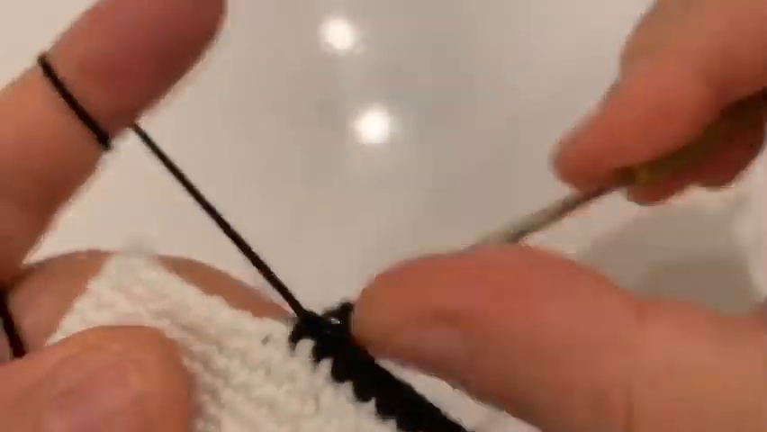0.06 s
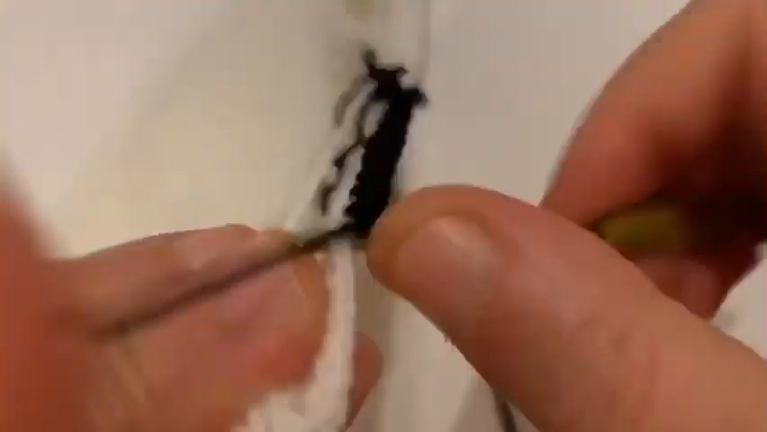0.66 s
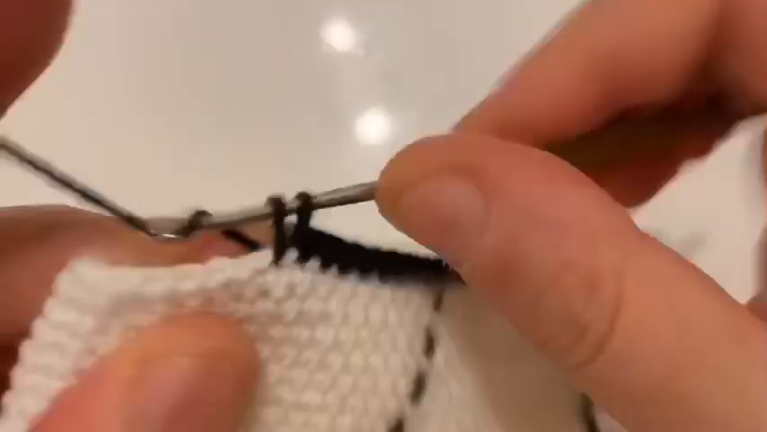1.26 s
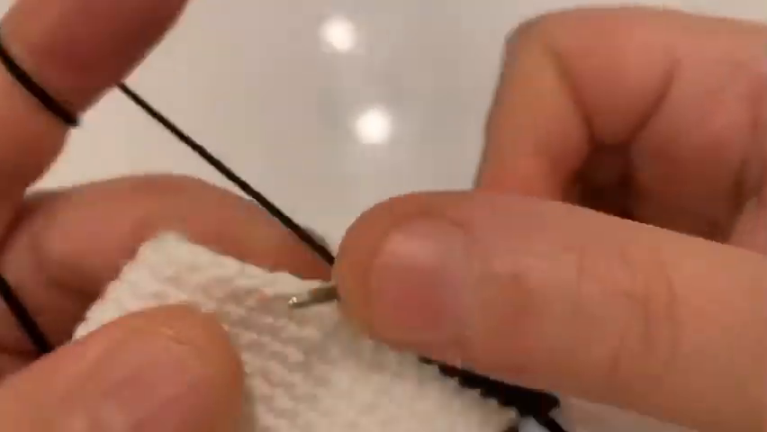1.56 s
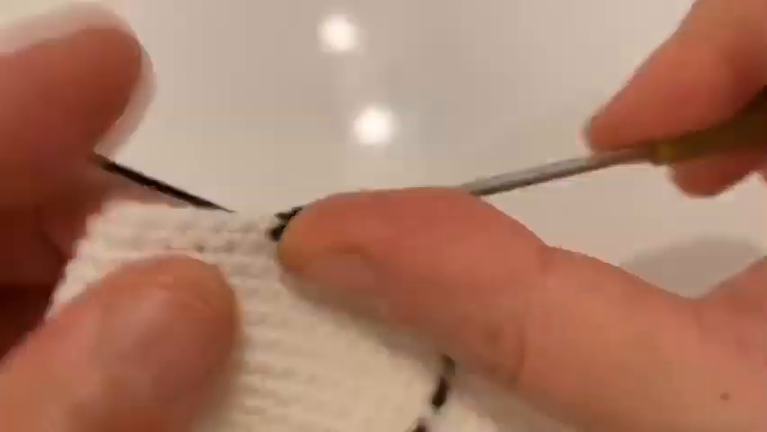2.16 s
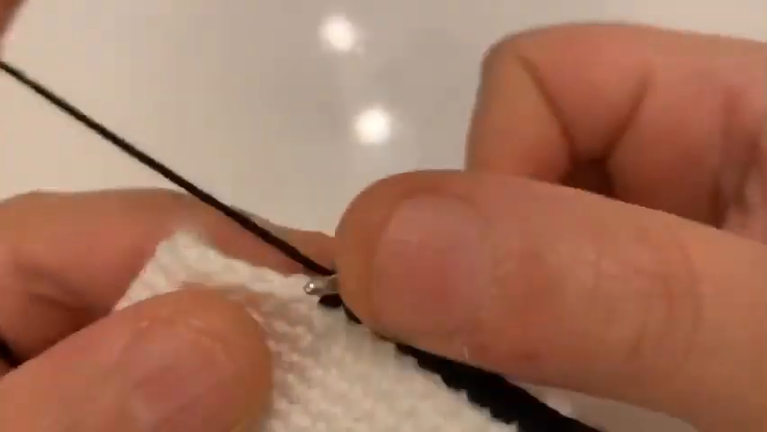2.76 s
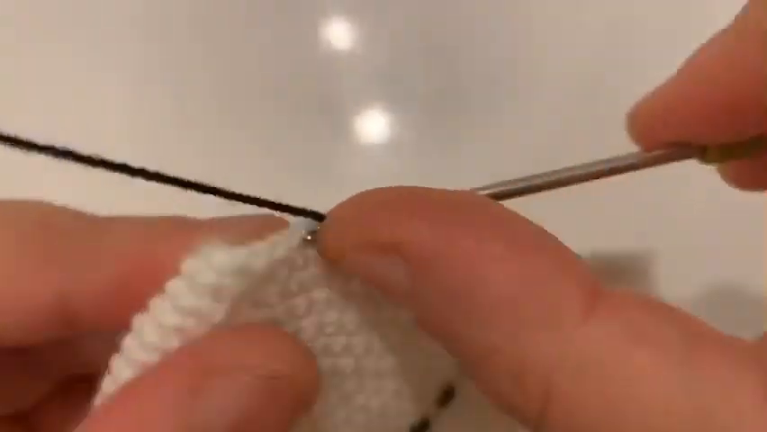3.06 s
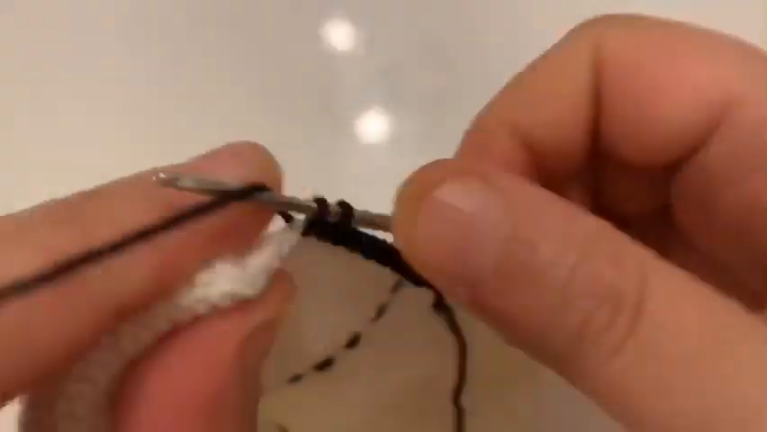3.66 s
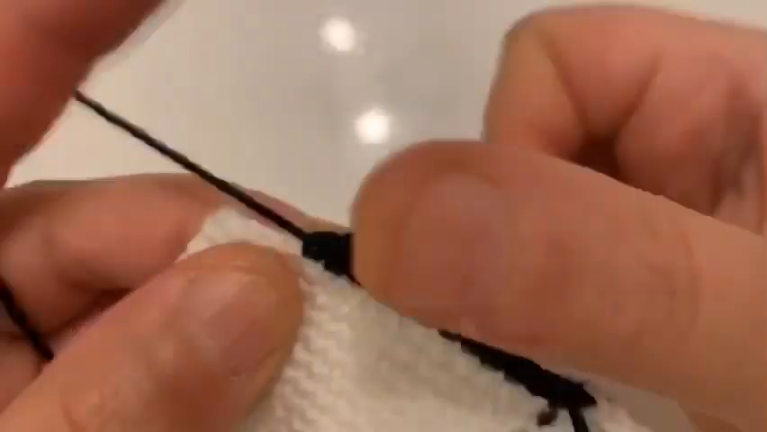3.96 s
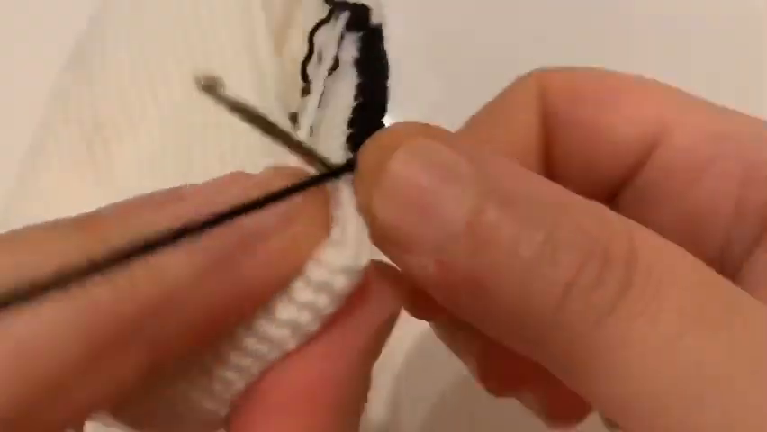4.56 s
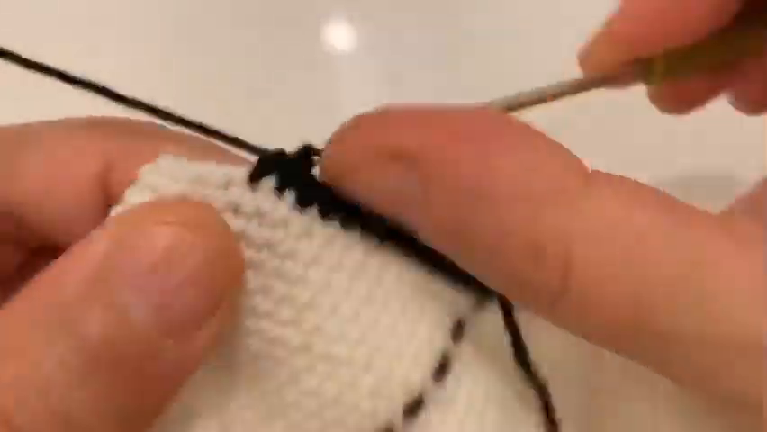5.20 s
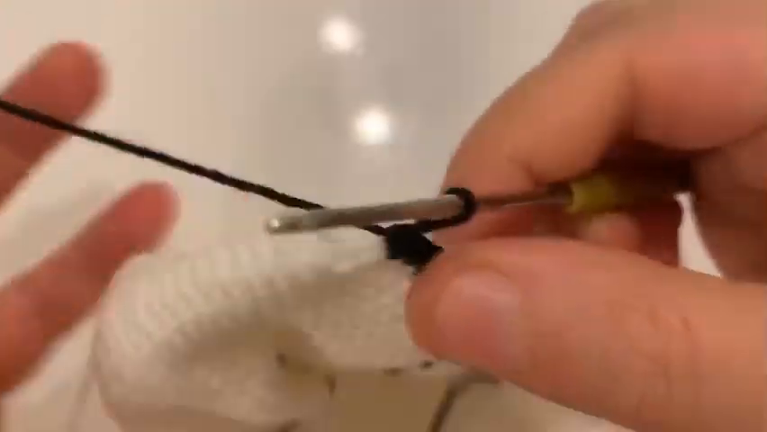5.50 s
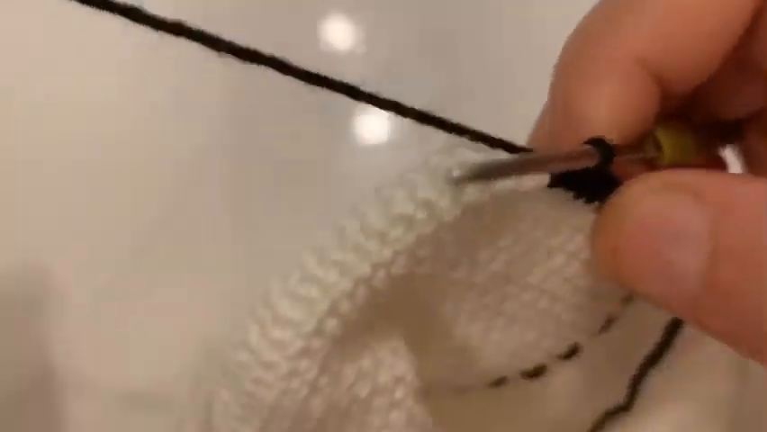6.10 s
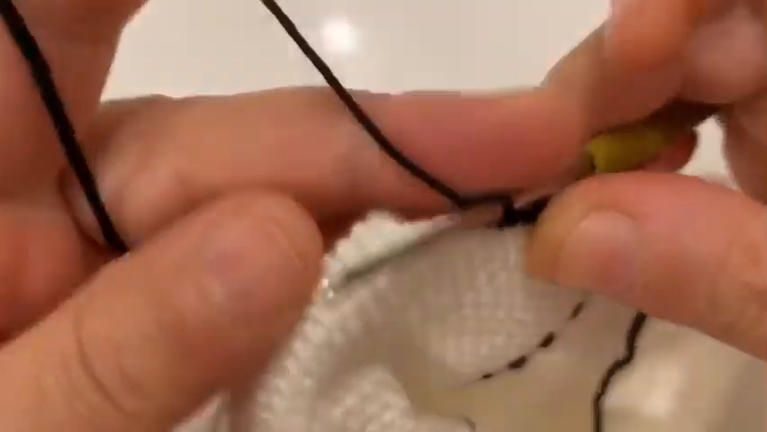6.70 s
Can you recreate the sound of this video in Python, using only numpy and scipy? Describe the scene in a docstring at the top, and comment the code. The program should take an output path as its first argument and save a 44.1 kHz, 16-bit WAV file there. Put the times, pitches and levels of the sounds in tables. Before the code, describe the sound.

A metal hook crochets yarn along the edge of a fabric piece, close to the microphone, at about one stitch a second. Fibres slide, catch and let go in grainy rustles, while the hook tip ticks through loops. The stretched fabric gives soft thuds, and a hand now and then bumps the table. Near the end, a tight strand faintly twangs and sizzles over the metal. The small room is quiet.

```python
"""A metal hook crochets yarn along the edge of a knitted piece, close up, about one stitch a second.
Fibres slip over hook and fingers in a grainy rustle, catch and let go. The hook tip ticks through
loops, and a strand drawn tight sometimes twangs or sizzles. The stretched fabric gives soft thuds,
and a hand now and then bumps the table. A quiet room lies behind."""
import sys
import numpy as np
from scipy import signal
from scipy.fft import rfft, irfft
from scipy.io import wavfile
from scipy.ndimage import uniform_filter1d

SR = 44100
rng = np.random.default_rng(int(sys.argv[2]) if len(sys.argv) > 2 else 0)


def unload_wav(signal):
    """Save mono or channel-first audio to the path in sys.argv[1] as 16-bit WAV at rate SR, clipped to [-1, 1]."""
    wavfile.write(
        sys.argv[1],
        SR,
        np.round(np.clip(np.atleast_2d(signal).T, -1, 1) * 32767).astype(np.int16),
    )


N = 301644
TIME = np.arange(N) / SR
FREQ = np.maximum(np.arange(N // 2 + 1) * SR / N, 1)

# the two microphone openings: f/Hz, likeness (0 to 1), left minus right/dB
MIC_PORTS = [(80, 0.82, 0), (390, 0.9, 1), (950, 0.64, 4.5), (1680, 0.28, 6), (2720, 0, 4.5), (3160, 0, 2),
             (5460, 0.35, -1), (7800, 1, -0.5), (14800, 1, 0)]
# how loud the room air and a faint airy wash are: t/s, level/dB
AIR_LEVELS = [(0, -64), (.6, -68.5), (3.1, -67), (5.5, -75.5), (6.84, -84)]
WASH_LEVELS = [(0, -75), (5.4, -84), (6.0, -63), (6.4, -60.5), (6.84, -61)]
# the tone colour of each noise, from bass to treble: f/Hz, level/dB
AIR_SPECTRUM = [(20, -4), (50, 1), (100, -6.5), (200, -11), (340, -12.5), (550, -23.5), (1100, -31.5),
                (2500, -41), (6000, -34.5), (9000, -33), (15500, -35)]
WASH_SPECTRUM = [(40, -1), (100, -3), (230, -1.5), (350, 0), (600, -23), (1200, -24), (2300, -16.5),
                 (5000, -85)]
TICK_SPECTRUM = [(100, -11), (450, 32.5), (1100, 24), (2500, 12), (5000, -27), (9000, 13), (15700, 18)]
SNAG_SPECTRUM = [(150, 33.5), (500, 20.5), (1100, 19.5), (2000, 12.5), (4000, 8.5), (6300, -1), (8700, 2),
                 (11000, -1.5), (15700, -14)]
SIZZLE_SPECTRUM = [(5000, -30), (9000, 4), (12000, 1.5), (14500, 10), (15700, 2.5)]
HISS_SPECTRUM = [(1500, -1.5), (3000, 1), (4400, 6.5), (5200, 3.5), (6400, 1.5), (7600, 0.5), (8100, 1),
                 (8700, 10.5), (9500, 0), (11000, 2), (13000, 5.5), (15700, 6)]
RASP_SPECTRUM = [(150, 6), (300, 3), (550, 4.5), (780, 3.5), (1080, 6.5), (1380, 0), (1720, 2), (2100, -3),
                 (2600, -2.5), (4000, -7.5), (8000, -30)]
RUMBLE_SPECTRUM = [(15, -63), (35, 5), (65, 1), (140, 0.5), (230, -11.5), (400, -38), (900, -27.5)]
# a hand bumps the table: t/s, level/dB, treble cutoff/Hz
TABLE_BUMPS = [(1.167, -32.5, 330), (2.416, -31, 520), (3.193, -28.5, 710), (3.664, -24.5, 1060),
               (4.451, -36.5, 610), (4.971, -24.5, 900), (5.559, -34.5, 283)]
# the notes the table rings at: f/Hz, relative level/dB, time to fade by 60 dB/s
TABLE_NOTES = [(53.8, 8, 0.63), (115.8, 7, 0.49), (137, 12.5, 0.51), (151.5, -31, .28), (211.4, 2.5, 0.51),
               (279.3, 1.5, 0.61), (349.3, 1.5, 0.48), (454, -4, 0.31), (677, -19, 0.092)]
# paths through the table top, direct and back from its edges: relative length, level/dB
TABLE_PATHS = [(0.999, 1), (1.75, -8), (2.499, -7), (3.601, -6)]
# the stretched fabric jerks: t/s, level/dB, f/Hz, overtone relative to the main swing/dB
FABRIC_JERKS = [(0.078, -27, 112, -5), (0.089, -34, 68, -14), (0.112, -35, 140, -10),
                (0.921, -37.5, 258, -13), (.965, -37.5, 129, -6.5), (1.012, -27.5, 76.6, -4),
                (1.337, -28.5, 80, -3), (1.396, -29, 102, -2.5), (1.453, -35.5, 92, -18),
                (1.478, -31, 60.6, -24), (2.212, -36, 133, -25), (2.251, -20, 82.3, -30),
                (2.581, -37, 69, -4), (2.654, -38, 78, -3.5), (2.700, -31.5, 109, -26),
                (3.539, -32.5, 63, -18), (3.947, -34, 80, -16), (4.05, -43, 83, -21),
                (4.790, -39.5, 76, -16), (5.282, -39.5, 69, -14), (5.356, -41, 62, -18),
                (5.473, -38.5, 78, -23), (5.934, -47, 114, -10), (6.765, -39, 112, -17)]
# a strand is drawn tight: t/s, level/dB, length/s, first f/Hz, last f/Hz
STRAND_PULLS = [(6.262, -51, 0.048, 70, 230), (6.542, -40.5, 0.0298, 123, 545)]
# the hook tip pops through a loop: t/s, level/dB
TIP_POPS = [(.076, -28.5), (1.009, -30), (1.394, -27), (1.475, -29), (2.505, -48), (2.663, -31.5),
            (5.244, -33), (5.921, -31.5), (6.537, -32), (6.598, -42)]
# the hook catches a strand and lets go: t/s, level/dB, fade/s, hiss of freed fibres/dB
CATCHES = [(.073, -42, 0.0064, -49), (.149, -43.5, 0.0053, -53), (0.227, -44.5, .007, -60),
           (0.726, -55, 0.01, -64), (0.921, -49, 0.039, -56), (1.009, -40.5, 0.0072, -46),
           (1.342, -36, 0.0064, -68), (1.393, -37, 0.014, -48), (1.476, -32.5, 0.0053, -45),
           (2.008, -61, 0.0035, -55.5), (2.202, -46, 0.0065, -62), (2.244, -37.5, 0.011, -44),
           (2.504, -39.5, .004, -58), (2.572, -40, 0.0049, -62), (2.613, -47, 0.0075, -51.5),
           (2.663, -43, .004, -60), (2.726, -42, 0.019, -55), (2.887, -49, 0.018, -55.5),
           (3.565, -46, 0.0079, -51), (3.909, -44, 0.015, -46.5), (4.184, -45.5, 0.0031, -64),
           (4.806, -45.5, 0.019, -60), (5.065, -41.5, 0.0041, -62), (5.246, -39, 0.013, -46.5),
           (5.469, -42, 0.011, -47), (5.922, -42, 0.0088, -54), (6.264, -44, 0.0072, -58),
           (6.599, -41.5, 0.0092, -59), (6.766, -46, 0.003, -62)]
# a tight strand runs over the bare metal: t/s, level/dB, build-up/s
METAL_SLIDES = [(6.224, -51.5, 0.0094), (6.301, -43, .003), (6.596, -45, 0.023)]
# the fingers lightly touch the piece, also between strokes: t/s, level/dB
TOUCH_LEVELS = [(0, -61.5), (.36, -64), (.55, -77.5), (1.1, -69.5), (1.6, -59), (1.76, -80.5), (2.15, -74),
                (2.6, -62.5), (3.08, -83.5), (3.24, -64), (3.85, -62.5), (4.4, -72.5), (4.68, -74.5),
                (5.2, -62), (5.78, -72), (6.0, -67), (6.12, -74), (6.84, -69.5)]
# one push or pull of the hook: t/s, length/s, hiss/dB, rasp/dB, f/Hz of the hollow between the fingers
HOOK_STROKES = [(0.087, 0.025, -52, -54, 1010), (0.167, 0.075, -51.5, -47.5, 1690),
                (0.298, 0.041, -48, -47, 1890), (0.743, 0.063, -60.5, -66.5, 1900),
                (0.917, 0.048, -54, -52.5, 2240), (0.987, 0.082, -54, -57, 2000),
                (1.309, 0.093, -57.5, -54, 2560), (1.389, 0.027, -48.5, -48.5, 1200),
                (1.447, 0.023, -46.5, -48, 1040), (1.506, .068, -51.5, -47, 1450),
                (1.991, 0.079, -60, -71, 1450), (2.169, .12, -53.5, -56, 1120),
                (2.285, 0.079, -75, -61.5, 1570), (2.6, .128, -54.5, -53.5, 2880),
                (2.771, 0.056, -53.5, -53.5, 5050), (2.873, 0.024, -60, -51.5, 4820),
                (3.355, 0.029, -55.5, -62.5, 2780), (3.474, 0.046, -51, -57.5, 3000),
                (3.546, 0.032, -52.5, -52, 1390), (3.756, 0.075, -59, -64, 2620),
                (3.893, 0.066, -51, -49, 1520), (3.98, 0.031, -58, -52.5, 2300),
                (4.046, 0.04, -47.5, -49, 2720), (4.117, .03, -59, -55, 1210),
                (4.267, 0.063, -88, -65.5, 1060), (4.528, 0.086, -60, -73, 4950),
                (4.703, 0.12, -58, -60, 2210), (5.028, 0.049, -59.5, -62, 2930),
                (5.209, 0.13, -53, -55, 1150), (5.361, 0.064, -52, -55, 1490),
                (5.43, 0.043, -51.5, -45, 945), (5.496, 0.064, -63, -65.5, 4000),
                (5.596, 0.08, -57, -54.5, 1440), (6.204, 0.03, -59.5, -59, 870),
                (6.239, 0.12, -66, -58.5, 1920), (6.75, 0.049, -63.5, -53.5, 1146)]

SNAG_BUILD_S, HISS_FADE_S, RASP_FADE_S = 0.0025, 0.016, 0.023


def undb(db):
    """Turn decibels into a number to multiply by."""
    return 10 ** (np.asarray(db) / 20)


def unit(x):
    """Scale a signal so that its average strength (rms) is 1."""
    return x / np.sqrt(np.mean(x ** 2))


def noise():
    """Two unrelated white noises."""
    return rng.standard_normal((2, N))


def wander(rate):
    """A random line, mostly between -1 and 1, that turns `rate` times a second."""
    return 1.01 * np.interp(TIME * rate, np.arange(N // 8), rng.standard_normal(N // 8))


def add(track, s, sound):
    """Mix a sound in at s seconds."""
    i = int(s * SR)
    track[..., i:i + sound.shape[-1]] += sound[..., :N - i]


def over_time(rows):
    """Join (t/s, level/dB) points into a volume curve."""
    s, db = np.transpose(rows)
    return undb(np.interp(TIME, s, db))


def over_pitch(rows):
    """Join a table's points into one curve per column, from bass to treble."""
    hz, *columns = np.transpose(rows)
    return [np.interp(np.log(FREQ), np.log(hz), c) for c in columns]


def bursts(rows):
    """A force that builds up to each given moment and fades after it."""
    force = np.zeros(N)
    for s, db, build, fade in rows:
        near = slice(*np.searchsorted(TIME, [s - 10 * build, s + 10 * fade]))
        t = TIME[near] - s
        force[near] += undb(db) * np.exp(-np.abs(t) / np.where(t < 0, build, fade))
    return force


def filtered(x, order, hz, kind="low"):
    """Keep what lies below hz, or inside a band."""
    return signal.sosfilt(signal.butter(order, hz, kind, fs=SR, output="sos"), x)


def stereo(pair, spectrum, treble_lag_s=.00026):
    """Colour two noises and mix them as the microphone hears them; treble reaches the right first."""
    shared, own = rfft(pair) * undb(over_pitch(spectrum)[0])
    likeness, side_db = over_pitch(MIC_PORTS)
    likeness = np.clip(likeness, 0, .995)
    lag = treble_lag_s * np.clip((FREQ - 1200) / 1200, 0, 1)
    right = (likeness * shared + np.sqrt(1 - likeness ** 2) * own) * np.exp(2j * np.pi * FREQ * lag)
    sides = np.array([shared * undb(side_db / 2), right * undb(-side_db / 2)])
    return unit(irfft(sides, N))


def lean_left(x, db=1.2):
    """Low sounds reach the left side a little louder."""
    return x * undb(np.array([[db], [-db]]) / 2)


def background(waver_db=3.5):
    """Still room air, and a faint wavering wash that comes up late."""
    air = over_time(AIR_LEVELS) * stereo(noise(), AIR_SPECTRUM)
    wash = over_time(WASH_LEVELS) * stereo(noise(), WASH_SPECTRUM)
    return air + wash * undb(waver_db * wander(15))


def walls(x, echo_db=-15, fade_s=0.37, dull_hz=4500):
    """The walls of a small room add a short, duller echo."""
    t = TIME[:SR // 2]
    tail = rng.standard_normal((2, len(t))) * 1000 ** (-t / fade_s) * (t > .005)
    tail /= np.sqrt(np.sum(tail ** 2) / 2)
    tail = filtered(tail, 1, dull_hz)
    return x + undb(echo_db) * signal.fftconvolve(x, tail, axes=1)[:, :N]


def knocks(spread=0.19, body_hz=60, tilt=1.36, ring_db=-23, echo_db=-17, echo_s=0.33):
    """A bump sends bending waves through the table top, highs first; table and room ring on."""
    out, t = np.zeros((2, N)), TIME[:SR // 2]
    f = np.maximum(np.arange(len(t) // 2 + 1) * SR / len(t), 1)
    ratio = f / body_hz
    body = ratio ** 2 / (1 + ratio ** 2) * (1 + ratio) ** -tilt
    travel_s = spread / np.sqrt(f)
    for s, db, cutoff_hz in TABLE_BUMPS:
        # the hand never lands on quite the same spot
        paths = sum(undb(path_db) * np.exp(-2j * np.pi * f * travel_s * length * rng.normal(1, 0.028))
                    for length, path_db in TABLE_PATHS)
        waves = irfft(body * paths, len(t))
        ring = np.zeros(len(t))
        for hz, note_db, fade_s in TABLE_NOTES:
            gain = undb(note_db + ring_db + rng.normal(0, 0.27))
            ring += gain * np.sin(2 * np.pi * (hz * t + rng.random())) * 1000 ** (-t / fade_s)
        middle, side = filtered(rng.standard_normal((2, len(t))), 1, [110, 420], "band")
        echo = undb(echo_db) * unit(middle + np.outer([0.9, -0.9], side)) * 1000 ** (-t / echo_s)
        onset = 1 - np.exp(-t / 0.0036)
        blow = waves / np.abs(waves).max() + (ring + echo) * onset
        blow = filtered(blow, 2, cutoff_hz)  # the soft hand dulls the blow
        add(out, s, undb(db) * blow / np.abs(blow).max())
    return lean_left(out)


def thuds(swell_cycles=0.88, damping=2.4, overtone_ratio=2.35):
    """The fabric swings once or twice at each jerk, with one overtone, until the fingers stop it."""
    out, t = np.zeros(N), TIME[:SR // 6]
    for s, db, hz, overtone_db in FABRIC_JERKS:
        for f, gain in ((hz, 1), (hz * overtone_ratio, undb(overtone_db))):
            age = f * t / swell_cycles
            swell = (age * np.exp(1 - age)) ** damping
            add(out, s, -undb(db) * gain * swell * np.sin(2 * np.pi * f * t))
    return lean_left(out)


def twangs():
    """The pitch of a plucked strand climbs as it is drawn tight."""
    out = np.zeros(N)
    for s, db, length, first_hz, last_hz in STRAND_PULLS:
        pull = np.linspace(0, 1, int(length * SR))
        phase = 2 * np.pi * np.cumsum(first_hz + (last_hz - first_hz) * pull) / SR
        add(out, s, undb(db) * np.sin(np.pi * pull ** 0.62) * np.sin(phase))
    return out


def ticks(trim_db=-7, build_s=.0002, fade_s=0.0013):
    """The hook tip pops through a loop with a dry tick, stopped at once by the grip."""
    force = bursts([(s, db + trim_db, build_s, fade_s) for s, db in TIP_POPS])
    return force * stereo(noise(), TICK_SPECTRUM)


def fibres(spectrum, rate, spread_db, smooth):
    """Single fibres slip about `rate` times a second, over the smooth hiss of countless smaller slips."""
    slips = rng.random(N) < rate / SR
    sizes = undb(spread_db * np.minimum(rng.exponential(size=N), 4))
    return stereo(unit(noise() * slips * sizes) + smooth * noise(), spectrum)


def shifting_gaps(x, depth_db=5):
    """Small gaps between fingers and fabric keep changing, so narrow bands of pitch come and go."""
    _, _, frames = signal.stft(x, SR, nperseg=1024)
    patches = rng.standard_normal(frames.shape[1:])
    for _ in range(2):  # blur across pitch, then across time
        patches = uniform_filter1d(patches, size=5, axis=0)
        patches = uniform_filter1d(patches, size=3, axis=1)
    gain = undb(depth_db * 2 * np.tanh(unit(patches) / 2))
    return unit(signal.istft(frames * gain, SR)[1][:, :N])


def sizzles(fade_s=0.0071):
    """A tight strand runs over the hook's bare metal with a thin sizzle."""
    force = bursts([(s, db, build, fade_s) for s, db, build in METAL_SLIDES])
    return force * fibres(SIZZLE_SPECTRUM, rate=2000, spread_db=3.2, smooth=0.54)


def snags():
    """A caught strand tightens, then a burst of fibres lets go."""
    force = bursts([(s, db, SNAG_BUILD_S, fade) for s, db, fade, _ in CATCHES])
    slips = fibres(SNAG_SPECTRUM, rate=1800, spread_db=1.7, smooth=0.86)
    return force * shifting_gaps(slips, depth_db=3.5)


def stalls(stall_s=0.018, dip_db=-2.5):
    """The sliding sound dips while a strand is caught, just before it lets go."""
    caught = bursts([(s - stall_s / 2, 0, stall_s, stall_s / 2) for s, *_ in CATCHES])
    return undb(dip_db * caught)


def stroke_force(length, fade_s, rise_s=.016, swell_db=3):
    """A stroke sets in, swells as the yarn tightens and dies away when the hook stops."""
    t = TIME[:int((length + 10 * fade_s) * SR)]
    swell = undb(swell_db * np.minimum(t / length - 1, 0))
    fade = np.exp(-np.maximum(t - length, 0) / fade_s)
    return np.minimum(t / rise_s, 1) * swell * fade


def strokes():
    """How strongly the hook's strokes hiss and rasp over time; the hiss stops sooner."""
    hiss, rasp = np.zeros((2, N))
    for s, length, hiss_db, rasp_db, _ in HOOK_STROKES:
        add(hiss, s, undb(hiss_db) * stroke_force(length, HISS_FADE_S))
        add(rasp, s, undb(rasp_db) * stroke_force(length, RASP_FADE_S))
    return np.array([hiss, rasp])


def hollows(ring_db=-8.5, sharpness=5.8):
    """The rasp rings the hollow between fingers and fabric, which has a new size at each grip."""
    out = np.zeros((2, N))
    slips = fibres(RASP_SPECTRUM, rate=700, spread_db=1.1, smooth=0.37)
    for s, length, _, rasp_db, hz in HOOK_STROKES:
        force = stroke_force(length, RASP_FADE_S)
        drive = np.take(slips, int(s * SR) + np.arange(len(force)), axis=1, mode="wrap")
        b, a = signal.iirpeak(hz, sharpness, SR)
        ring = signal.lfilter(b, a, signal.lfilter(b, a, drive))
        add(out, s, undb(rasp_db + ring_db) * force * unit(ring))
    return out


def rustle(touch_hiss_db=-2, judder_db=1.57, rumble_db=2, lurch_db=3.5):
    """Sliding yarn sticks and slips: fibres hiss, its twisted threads rasp, the held fabric rumbles."""
    touch = np.outer(undb([touch_hiss_db, 0]), over_time(TOUCH_LEVELS))
    hiss_force, rasp_force = np.hypot(strokes(), touch)  # hypot adds the two as powers
    judder = undb(judder_db * wander(130)) * stalls()
    freed = bursts([(s, db, SNAG_BUILD_S, fade) for s, _, fade, db in CATCHES])
    fine = shifting_gaps(fibres(HISS_SPECTRUM, rate=4000, spread_db=1.6, smooth=0.88))
    coarse = shifting_gaps(fibres(RASP_SPECTRUM, rate=700, spread_db=2.93, smooth=1.0))
    lurch = undb(rumble_db + lurch_db * wander(25))
    rumble = np.sqrt(hiss_force * rasp_force) * lurch * stereo(noise(), RUMBLE_SPECTRUM)
    hiss = np.hypot(judder * hiss_force, freed) * fine
    rasp = judder * (rasp_force * coarse + hollows())
    return hiss + rasp + rumble


def scene():
    """Handwork up close, the table under it, the room behind; the soft thuds do not reach the walls."""
    handwork = rustle() + snags() + sizzles() + ticks() + twangs()
    return walls(handwork) + thuds() + knocks() + background()


def record(dry, top_hz=15950):
    """Cut off the very highest treble."""
    return signal.sosfilt(signal.ellip(10, .2, 70, top_hz, fs=SR, output="sos"), dry)


dry = scene()
out = record(dry)
unload_wav(out)
```